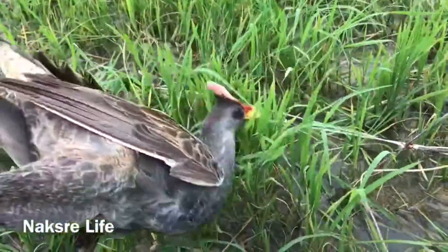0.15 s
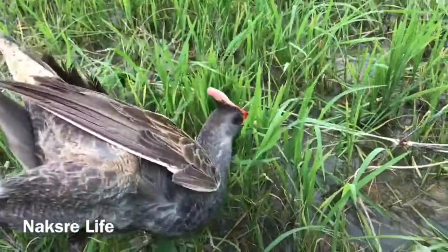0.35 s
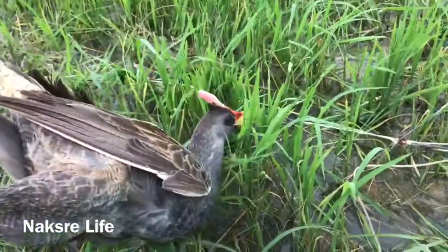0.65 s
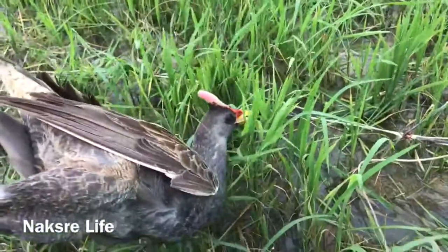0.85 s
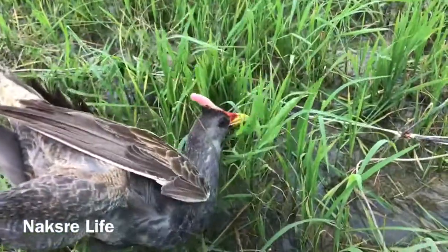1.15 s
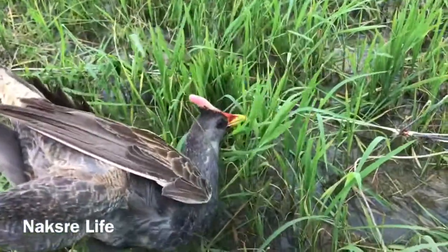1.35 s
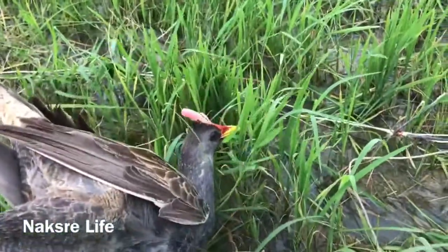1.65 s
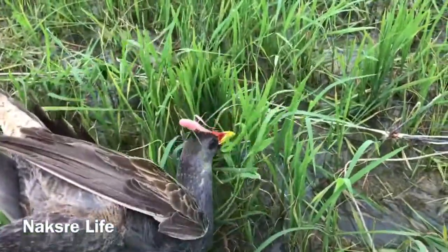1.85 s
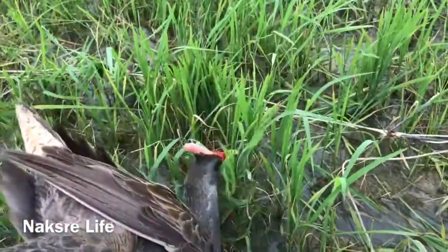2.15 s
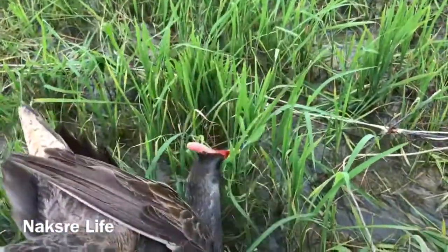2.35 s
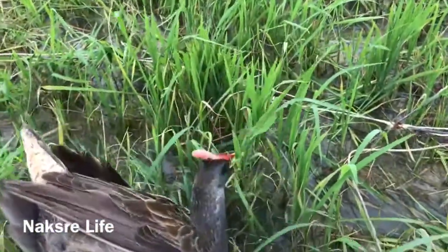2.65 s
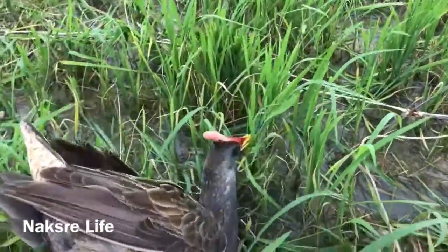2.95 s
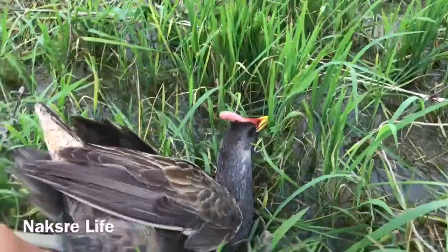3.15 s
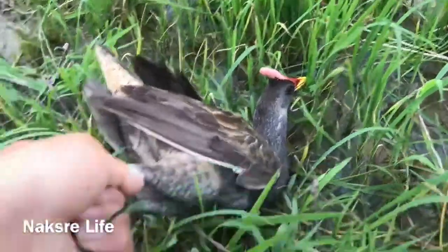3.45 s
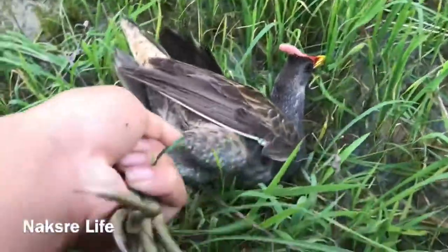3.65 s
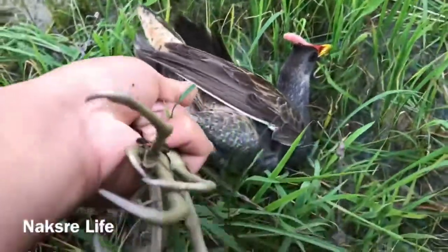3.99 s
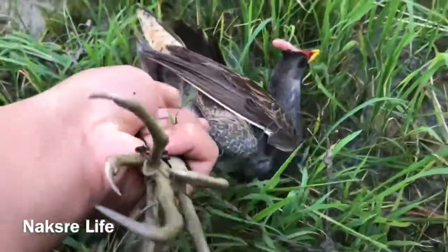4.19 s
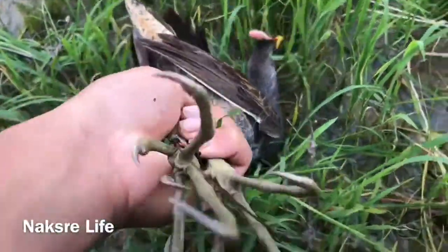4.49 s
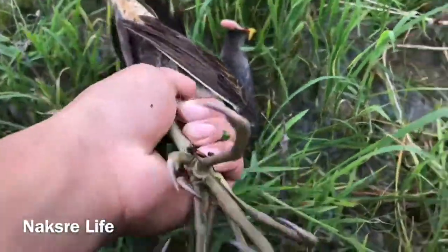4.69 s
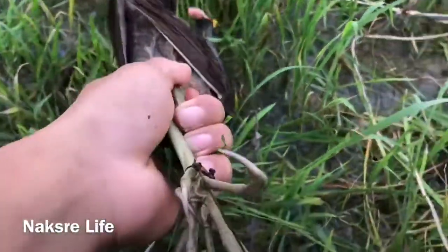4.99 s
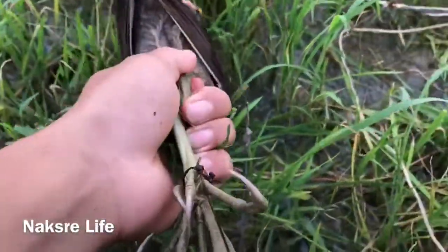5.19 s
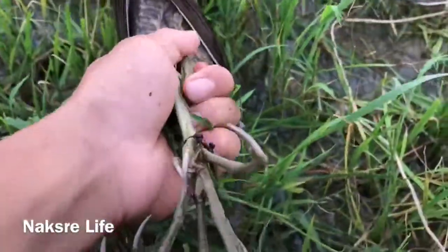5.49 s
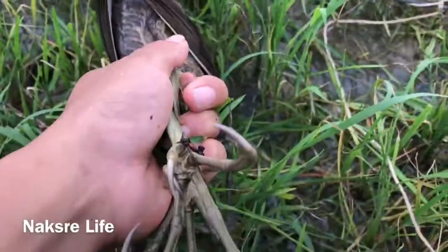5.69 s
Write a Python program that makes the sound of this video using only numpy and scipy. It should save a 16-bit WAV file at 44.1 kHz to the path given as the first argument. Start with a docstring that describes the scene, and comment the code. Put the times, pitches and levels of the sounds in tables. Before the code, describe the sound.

An open wet rice field, dry and without reverberation, heard through a close handheld microphone, equal in both channels. Low breeze rumble and soft dull bumps lie under a faint, wavering chorus of high chirps around 3 kHz. At 0.15 s a dry stalk snaps. From 0.3 to 1.1 s a large bird nearby squawks loudly: a tiny thin whistle, a hoarse start, then a bright nasal tone near 520 Hz sinking abruptly into a brief croak. Between calls come small peeps, distant buzzing rasps around 1.4 s and bumps near 1.7 s. The second squawk, 2.6 to 3.3 s, is a little louder, rough at first, clearing around 2.8 s, then cracking and slowing into a croak. Afterwards it is quiet: weak chirping, a soft distant piping note repeating about every 0.3 s from 3.4 s, sparse tiny ticks, leaf brushes around 4.5 and 5.3 s, and faint rasps near 5.2 and 5.4 s.

```python
"""A light breeze rumbles on the microphone under a far chirping chorus and dry taps of rice stalks.
Then a watercock gives two squawks: each opens with a thin whistle, turns hoarse, clears to a nasal tone
and ends in a slowing croak. The whistle is a few sine partials; the squawk is a pulse train and hiss
ringing throat resonances. Field animals are sine peeps, pulsed rasps and piping; leaves, stalks and
breeze are shaped noise, and soft bumps are low sine bursts."""
import sys
import numpy as np
from scipy import signal
from scipy.fft import rfft, irfft, next_fast_len
from scipy.io import wavfile
from scipy.ndimage import uniform_filter1d, map_coordinates

SR = 44100
rng = np.random.default_rng(int(sys.argv[2]) if len(sys.argv) > 2 else 0)


def unload_wav(signal):
    """Save mono or channel-first audio to the path in sys.argv[1] as 16-bit WAV at rate SR, clipped to [-1, 1]."""
    wavfile.write(
        sys.argv[1],
        SR,
        np.round(np.clip(np.atleast_2d(signal).T, -1, 1) * 32767).astype(np.int16),
    )


N = 257089
TIME = np.arange(N) / SR


def amp(db):
    """Logarithmic level: decibels to linear gain."""
    return 10 ** (np.asarray(db) / 20)


def unit(x):
    """Normalization: scale to an rms of 1."""
    return x / np.sqrt(np.mean(x ** 2) + 1e-20)


def curves(rows):
    """Linear interpolation: one value per sample for each column after the time."""
    s, *columns = np.transpose(rows)
    return [np.interp(TIME, s, column) for column in columns]


def wobble(rate):
    """Band-limited random modulation: a smooth curve through `rate` random knots a second."""
    knots = rng.standard_normal(int(N * rate / SR) + 4)
    return map_coordinates(knots, [TIME * rate])


def gate(start, end, fade):
    """Rectangular envelope: 1 between two times, with linear ramps."""
    return np.clip(np.minimum(TIME - start, end - TIME) / fade + .5, 0, 1)


def bell(centre, half_length):
    """Gaussian envelope: a smooth rise and fall around one moment."""
    return np.exp(-((TIME - centre) / half_length) ** 2)


def filtered(x, response):
    """Linear filtering: multiply the spectrum by a response of frequency."""
    size = next_fast_len(N + 8192)
    return irfft(rfft(x, size) * response(np.fft.rfftfreq(size, 1 / SR)), size)[:N]


def noise(spectrum):
    """Coloured noise: white noise shaped by rows of f/Hz, relative level/dB, then set to rms 1."""
    f, db = np.transpose(spectrum)

    def colour(hz):
        return amp(np.interp(np.log(hz + 1), np.log(f), db, left=-120, right=-120))

    return unit(filtered(rng.standard_normal(N), colour))


def pulses(times, sizes):
    """Band-limited impulses: windowed sincs centred between samples."""
    at = times[:, None] * SR
    index = np.floor(at).astype(int) + np.arange(-7, 9)
    shape = np.sinc(index - at) * np.cos(np.pi * (index - at) / 16) ** 2
    return np.bincount(np.clip(index, 0, N - 1).ravel(), (sizes[:, None] * shape).ravel(), N)


def resonate(x, modes, size=4096):
    """Minimum-phase resonance: causal ringing with steep skirts, from rows of f/Hz, width/Hz, level/dB."""
    hz = np.fft.rfftfreq(size, 1 / SR)
    gain = sum(amp(db) / (1 + ((hz - centre) / width) ** 2) ** 2 for centre, width, db in modes)
    # folding the cepstrum onto positive times makes the response causal
    cepstrum = irfft(np.log(gain + 1e-6))
    cepstrum[1:size // 2] *= 2
    cepstrum[size // 2 + 1:] = 0
    return signal.fftconvolve(x, irfft(np.exp(rfft(cepstrum))))[:N]


def steady(x):
    """Envelope normalization: even out the loudness over a few pulses."""
    power = uniform_filter1d(uniform_filter1d(x ** 2, size=500), size=300)
    return x / np.sqrt(np.abs(power) + 1e-6 * np.mean(x ** 2))


# syrinx pulse rate of each squawk [t/s, f/Hz]
PITCH_1 = [(0.32, 655.8), (0.36, 621), (0.41, 600.5), (0.5, 549.7), (0.55, 527.6), (0.6, 540), (0.675, 516),
           (0.7, 528.4), (0.745, 518.4), (0.8, 525.3), (0.94, 514.4), (1.056, 518), (1.1, 185.5)]
PITCH_2 = [(2.61, 589), (2.67, 542), (2.72, 554.8), (2.77, 551.4), (2.81, 518), (2.86, 497.4),
           (2.915, 537.4), (2.935, 528.5), (2.965, 494), (3.135, 496.8), (3.18, 476.6), (3.24, 370.6),
           (3.265, 198)]
# loudness and beak colour [t/s, low register level/dB, middle re low/dB, high re low/dB]
EFFORT_1 = [(0.325, -49.5, 18, 10), (0.331, -35.5, 3.5, -1), (0.402, -33.5, 8, 2.5), (0.48, -34.5, 8, 3),
            (0.938, -34, 3.5, -2.5), (1.065, -35.5, 2.5, -6), (1.078, -37, 11, 5),
            (1.098, -36.5, -1.5, -12)]
EFFORT_2 = [(2.612, -49, 16, 11), (2.622, -32.5, -6.5, -5.5), (2.668, -31.5, -7.5, -4.5),
            (3.118, -29, -7, -4.5), (3.166, -30.5, -12.5, -9), (3.234, -28.5, -3.5, -0.5),
            (3.265, -31, -14, -11.5)]
# throat and beak resonances [f/Hz, width/Hz, level/dB]
THROAT_1 = [(514, 210, -5.5), (997, 150, -9), (1320, 43, -8), (1540, 310, -15.5), (1770, 250, 1.5),
            (2176, 210, 3), (2680, 235, -1.5), (3670, 290, -3), (4070, 210, -14), (4660, 300, -9.5),
            (5300, 99, -25.5), (5720, 340, -15), (7200, 1020, -27.5), (9400, 1060, -28),
            (12500, 8200, -47.5)]
THROAT_2 = [(540, 303, -5.5), (986, 213, -3), (1533, 170, -13), (1988, 74, -9.5), (2570, 530, -15),
            (3446, 290, 0), (4007, 71, -1.5), (4490, 500, -6.5), (6300, 1000, -28), (9300, 1170, -31.5),
            (14300, 3000, -56.5)]
# resonances of the tightened throat in the closing croak [f/Hz, width/Hz, level/dB]
CROAK_1 = [(507, 370, -5), (1034.5, 254, -4), (1884, 460, 1), (2230, 660, 1), (3834, 410, -8.5),
           (4630, 460, -18), (5820, 500, -26), (8700, 1700, -29)]
CROAK_2 = [(404, 370, -2), (860, 190, 5.5), (1102, 184, 11.5), (2010, 270, -11), (3200, 414, -5),
           (3850, 280, 5), (4720, 730, -7.5), (6350, 2100, -25.5), (8500, 2500, -26), (13400, 2200, -42)]
# broad bands filled by the rushing air while the voice is rough [f/Hz, width/Hz, level/dB]
RUSH = [(2970, 480, -3), (4300, 520, -6), (5240, 500, -14.5), (6750, 910, -20), (9210, 720, -20.5),
        (11700, 3700, -38.5)]
AIR, LEAK = 1.2, .13  # hiss per unit of roughness; share of the uneven register that adds hiss
SHIMMER = .36  # spread of pulse size (natural log) per unit of roughness


def squawk(pitch, course, effort, throat, croak, jitter, limp, tremor, echo, echo_time, rush_db):
    """Source-filter principle: syrinx pulses and hiss ring the throat; roughness shakes the pulses.

    jitter and limp are in cycles, echo_time in seconds."""
    hz, rough, uneven = syrinx(pitch, course)
    cycles = np.cumsum(hz * (1 + tremor * wobble(90) * (0.2 + rough))) / SR
    count = np.arange(1, int(cycles[-1]))
    times = np.interp(count, cycles, TIME)

    def at_pulse(curve):
        return np.interp(times, TIME, curve)

    # the membranes lurch over a few cycles at a time, and a little from each pulse to the next
    late = at_pulse(rough) * (at_pulse(wobble(260)) + 0.59 * rng.standard_normal(len(count)))
    strong = at_pulse(rough) * (at_pulse(wobble(200)) + .7 * rng.standard_normal(len(count)))
    # every other pulse comes early and weak, which adds lines halfway between the harmonics
    swing = limp * (-1.) ** count * at_pulse(uneven * (1 + .3 * wobble(14)))
    pulse_times = times + (jitter * late + swing) / at_pulse(hz)
    flow = pulses(pulse_times, np.exp(SHIMMER * strong + 2 * swing))

    # air hisses through once in each cycle
    hiss = filtered(rng.standard_normal(N), lambda f: np.hypot(f, 800) / np.hypot(f, 7000))
    hiss = hiss * (1 + np.cos(2 * np.pi * cycles))
    source = unit(windpipe(flow)) + AIR * (rough + LEAK * uneven) * hiss

    # the throat tightens as the pitch sinks into the croak
    tight = np.clip((470 - hz) / 80, 0, 1)
    voice = resonate(source * (1 - tight), throat) + resonate(source * tight, croak)
    voice = voice + amp(rush_db) * resonate(hiss * rough * (1 - tight), RUSH)

    # the opening of the beak shifts the balance between three registers
    def below(f, edge_hz):
        return 1 / (1 + (f / edge_hz) ** 20)

    low = filtered(voice, lambda f: below(f, 1400))
    middle = filtered(voice, lambda f: below(f, 3000)) - low
    high = voice - low - middle
    # the treble also glances off the wet ground, by a path that shifts as the head moves
    delay = echo_time * (1 + 0.052 * wobble(5.91))
    high = high + echo * map_coordinates(high, [(TIME - delay) * SR])
    db, middle_db, high_db = curves(effort)
    call = amp(db) * (steady(low) + amp(middle_db) * steady(middle) + amp(high_db) * steady(high))
    return call * gate(pitch[0][0], pitch[-1][0] + .002, fade=0.013)


# instants when the voice cracks [t/s, half length/s, pitch jump/Hz, roughness]
CRACKS = [(.402, .005, 0, 1.1), (.903, .009, -13, .15), (.978, .008, -28, .35), (2.833, .007, 38, 1),
          (3.077, .011, -70, .9), (3.16, .007, -25, .5)]
# course of each squawk [hoarse roughness, clears at t/s, roughness once clear,
# alternate pulses start to limp at t/s, limp rise time/s]
COURSE_1 = (.46, .476, .14, .3, .6)
COURSE_2 = (.62, 2.802, .1, 2.952, .02)
ONSET_ROUGH, CROAK_ROUGH = .9, .65  # roughness of the first instant and of the full croak
ONSET_S, CLEARING_S = 0.04, 0.018  # decay of the onset roughness; time for the hoarseness to clear
BREAK_HZ, BREAK_RANGE_HZ = 490, 64.4  # below this pitch, over this range, regularity is lost


def syrinx(pitch, course):
    """Irregular oscillation: pitch, roughness and limp, rough at onset, cracks and pitch collapse."""
    hoarse, clears_at, clear, limps_at, limp_rise = course
    hz = curves(pitch)[0] + sum(jump * bell(s, length) for s, length, jump, _ in CRACKS)
    onset = ONSET_ROUGH * np.exp(-np.maximum(TIME - pitch[0][0], 0) / ONSET_S)
    body = clear + (hoarse - clear) * np.clip((clears_at - TIME) / CLEARING_S + .5, 0, 1)
    cracks = sum(rough * bell(s, length) for s, length, _, rough in CRACKS)
    collapse = np.clip((BREAK_HZ - hz) / BREAK_RANGE_HZ, 0, 1)
    rough = np.max([onset, body, cracks, CROAK_ROUGH * np.sqrt(collapse)], axis=0)
    uneven = np.clip((TIME - limps_at) / limp_rise, 0, 1) * (1 - collapse)
    return hz, rough, uneven


def windpipe(x):
    """Dispersion: the long windpipe lets the treble out first, smearing each pulse by up to 3 ms."""
    return filtered(x, lambda hz: np.exp(-2j * np.pi * .003 * 3000 * np.log1p(hz / 3000)))


def hollow(x, notch_hz, notch_width):
    """Notch filtering: one narrow band of the voice nearly vanishes, which sounds hollow."""
    return filtered(x, lambda hz: 1 - .95 * np.exp(-((hz - notch_hz) / notch_width) ** 2))


# opening whistle of each squawk [t/s, f/Hz, level/dB]
WHISTLE_1 = [(.281, 2010, -54), (.287, 2316, -37), (.3, 2347, -30), (.312, 2346, -37), (.319, 2296, -23.5),
             (.325, 2310, -25.5), (.332, 2280, -45)]
WHISTLE_2 = [(2.574, 2156, -53), (2.582, 2273, -31.5), (2.598, 2250, -30.5), (2.612, 2164, -32.5),
             (2.624, 2190, -56)]


def whistle(rows, throat, second_db, third_db, rasp_db):
    """Harmonic synthesis: before it breaks into pulses the syrinx sings one high note, with growing rasp."""
    hz, db = curves(rows)
    start, end = rows[0][0], rows[-1][0]
    phase = 2 * np.pi * np.cumsum(hz * (1 + 0.0021 * wobble(200))) / SR
    upper = np.sin(3 * phase) + .4 * np.sin(4 * phase)
    tone = np.sin(phase) + amp(second_db) * np.sin(2 * phase) + amp(third_db) * upper
    growth = np.clip((TIME - start) / (end - start), 0, 1) ** 2
    rasp = unit(resonate(rng.standard_normal(N), throat)) * growth
    return (np.sqrt(2) * tone + amp(rasp_db) * rasp) * amp(db) * gate(start, end, fade=0.004)


# soft low bumps close to the microphone [t/s, f/Hz, peak level/dB]
BUMPS = [(.07, 86, -29.5), (0.263, 68, -28.5), (0.48, 146, -31.5), (0.513, 145, -35.5), (0.567, 100, -30.5),
         (0.799, 70, -33.5), (0.886, 98, -33.5), (1.01, 70, -38), (1.641, 60.4, -35.5), (1.705, 99, -35.5),
         (1.857, 70, -40), (2.42, 74.6, -44), (4.781, 61, -40.5)]


def bumps(length):
    """Gaussian tone burst: each bump is a dull thud, a low sine under a brief bell."""
    out = np.zeros(N)
    for s, hz, db in BUMPS:
        tone = np.sin(2 * np.pi * hz * (TIME - s) + rng.uniform(0, 2 * np.pi))
        out += amp(db) * tone * bell(s, length)
    return out


# stalks snapping and tapping [t/s, peak level/dB, f/Hz of the stalk]
TICKS = [(.147, -34, 1800), (.151, -29, 1600), (2.255, -48, 800), (3.655, -54, 7000), (4.222, -53, 7500),
         (4.468, -53, 9000), (4.665, -50, 1100), (4.693, -55, 700), (4.93, -53, 450), (5.565, -52, 8000)]


def ticks(t60, breadth):
    """Damped resonance: each stalk gives a short dry noise burst around its own pitch."""
    out, t = np.zeros(N + SR), np.arange(2048) / SR
    for s, db, hz in TICKS:
        b, a = signal.iirpeak(hz, 1 / breadth, fs=SR)
        strike = rng.standard_normal(len(t)) * amp(-60 * t / t60)
        burst = signal.lfilter(b, a, signal.lfilter(b, a, strike))
        out[round(s * SR):][:len(t)] += amp(db) * burst / np.abs(burst).max()
    return out[:N]


# steady stir of the rice leaves [t/s, level/dB]
LEAVES = [(0, -74.5), (1.8, -74), (2.15, -70), (2.55, -69), (3.3, -76), (4.7, -71.5), (5.83, -73.5)]
# single leaves brushing past [t/s, level/dB]
SWISHES = [(.13, -68), (1.435, -69.5), (1.6, -79), (4.3, -76.5), (4.48, -69), (5.299, -65.5), (5.58, -73)]
# colour of the rustle [f/Hz, relative level/dB]
SWISH = [(2500, 4), (4000, -2.5), (5000, -0.5), (6600, 6), (7600, 2), (8600, 5), (9800, 1.5), (10600, -6.5),
         (15500, -5)]
SWISH_S = 0.019  # half length of a brush


def leaves(grain_db):
    """Friction noise: rice leaves slide over one another and over feathers, with a fine crackle."""
    brushes = sum(amp(db) * bell(s, SWISH_S) for s, db in SWISHES)
    level = np.hypot(amp(curves(LEAVES)[0]), brushes)
    crackle = amp(grain_db * wobble(400) + 1.8 * wobble(25))
    return level * unit(noise(SWISH) * crackle)


# the nearest peeps of the chorus [t/s, f/Hz, peak level/dB]
PEEPS = [(1.2, 3410, -50), (1.351, 5360, -70), (1.869, 3300, -50.5), (2.19, 3640, -52), (2.31, 3520, -53),
         (2.42, 3460, -58), (3.509, 3100, -60), (5.09, 3150, -60)]
PEEP_S, PEEP_FALL = .024, .4  # half length; half the fall in pitch (share per second)


def near_peeps(length, fall):
    """Frequency glide: a few peeps stand out of the chorus, each a short falling note."""
    flutter = np.cumsum(0.01425 * wobble(270)) / SR
    out = np.zeros(N)
    for s, hz, db in PEEPS:
        t = TIME - s
        out += amp(db) * np.sin(2 * np.pi * hz * (t - fall * t ** 2 + flutter)) * bell(s, length)
    return out


# far rasping calls [t/s, length/s, level/dB]
RASPS = [(1.36, 0.03, -57.5), (1.404, 0.052, -54), (5.184, 0.055, -57), (5.393, 0.027, -64),
         (5.423, 0.06, -57.5)]
# a distant soft piping note, repeated at one level [t/s]
PIPING = [3.42, 3.69, 4.01, 4.33, 4.64, 4.92, 5.16, 5.42, 5.69]
PIPING_DB = -71.5  # peak level


def far_calls(rasp_rate_hz, pipe_hz, pipe_length):
    """Pulse excitation and pure tone: a few buzzing rasps and a repeated piping note across the field."""
    cycles = np.cumsum(rasp_rate_hz * (1 + 0.043 * wobble(72))) / SR
    times = np.interp(np.arange(1, int(cycles[-1])), cycles, TIME)
    train = pulses(times, rng.lognormal(0, 0.14, len(times)))
    buzz = unit(resonate(train, [(3230, 490, 9), (4040, 1100, -1), (6800, 1200, -31)]))
    rasps = buzz * sum(amp(db) * gate(s, s + length, fade=0.0055) for s, length, db in RASPS)
    note = np.sin(2 * np.pi * np.cumsum(pipe_hz * (1 + 0.0187 * wobble(60))) / SR)
    return rasps + amp(PIPING_DB) * note * sum(bell(s, pipe_length) for s in PIPING)


# colour of the blurred chorus [f/Hz, relative level/dB]
FAR = [(1800, -36), (2400, -16.5), (2850, -5.5), (3250, 0), (3600, -1.5), (4100, -10.5), (5000, -22),
       (7000, -25)]


def chorus(peep_hz, spread, fall, length, overtone_db, peep_db, count=260):
    """Superposition: many far falling peeps, mostly blurred into a band of noise by the distance."""
    t = np.arange(int(length * SR)) / SR
    peeps = np.zeros(N + len(t))
    for k, (when, tune, size) in enumerate(rng.standard_normal((count, 3))):
        hz = peep_hz * np.exp(spread * tune - fall * (t / length - .5))
        phase = 2 * np.pi * np.cumsum(hz) / SR
        tone = np.sin(phase) + amp(overtone_db) * np.sin(2 * phase)
        start = int((k + when / 2) % count / count * N)
        peeps[start:start + len(t)] += amp(2 * size) * np.hanning(len(t)) * tone
    scattered = unit(peeps[:N] * (1 + 0.45 * wobble(300)))
    return chorus_level(waver_db=3.0, waver_rate=16) * (amp(peep_db) * scattered + noise(FAR))


# underlying level of the far chorus [t/s, level/dB]
CHORUS = [(0, -61.5), (1.8, -58), (2.5, -59.5), (3.3, -67), (3.6, -64.5), (5.83, -63)]
# one group of callers swells above the rest [centre t/s, length/s, level/dB]
SWELLS = [(0.198, 0.075, -57.5), (1.203, .1, -58), (1.65, 0.069, -54), (1.894, 0.049, -53.5),
          (3.796, 0.066, -60), (3.995, 0.048, -58.5), (4.78, 0.063, -62)]
# moments when the chorus falls quiet [t/s]
LULLS = [.11, 1.335, 2.145, 2.445, 3.675, 4.395, 4.64, 5.16, 5.625]
SWELL_EDGE_S, LULL_DB, LULL_S = .02, -8, 0.017  # swell ramp; lull depth and half length


def chorus_level(waver_db, waver_rate):
    """Amplitude modulation: the chorus wavers, dips in lulls, and now and then a group swells."""
    lulls = LULL_DB * sum(bell(s, LULL_S) for s in LULLS)
    bed = amp(curves(CHORUS)[0] + lulls + waver_db * wobble(waver_rate))
    swells = sum(amp(db) * gate(s - length / 2, s + length / 2, SWELL_EDGE_S) for s, length, db in SWELLS)
    return np.hypot(bed, swells)


# level of the wind rumble before gusts and low cut [t/s, level/dB]
BREEZE = [(0, -49), (.27, -46.5), (.42, -47.5), (.6, -47.5), (.95, -53.5), (1.35, -51), (1.7, -52),
          (2.1, -53.5), (2.45, -52), (2.6, -60), (3.05, -61), (3.8, -56), (4.22, -52.5), (4.6, -55),
          (5.83, -57)]
# colour of the rumble before the low cut [f/Hz, relative level/dB]
RUMBLE = [(13, -57), (22, -17.5), (48, 5), (81, 0.5), (134, -6), (257, -16.5), (342, -24), (370, -28.5),
          (500, -52), (650, -64), (1100, -120)]
# level of the open field's hush [t/s, level/dB]
HUSH = [(0, -66.5), (3.3, -69), (5.83, -72.5)]
# colour of the hush [f/Hz, relative level/dB]
FIELD = [(160, -15), (280, -2.5), (367, -10.5), (601, -9), (745, -15), (1420, -13.5), (2060, -16),
         (2600, -13.5), (3380, -47), (5720, -120)]
GUST_DB, GUSTS_PER_S = 2.5, 20  # the breeze flutters about its level


def breeze():
    """Turbulent pressure noise: soft buffeting at the microphone over the hush of the open field."""
    db, = curves(BREEZE)
    air = noise(RUMBLE)
    even_air = air / np.sqrt(np.abs(uniform_filter1d(air ** 2, size=4000)) + 0.01)
    buffet = amp(db + GUST_DB * wobble(GUSTS_PER_S)) * even_air
    rumble = filtered(buffet, lambda hz: hz ** 4 / (hz ** 4 + 33 ** 4))
    return rumble + amp(curves(HUSH)[0]) * noise(FIELD)


def scene():
    """Linear mixing: the bird close by in the open, the field behind it; both channels alike."""
    first = squawk(PITCH_1, COURSE_1, EFFORT_1, THROAT_1, CROAK_1, jitter=0.065, limp=.011,
                   tremor=0.0124, echo=0.5, echo_time=.0017, rush_db=2.0)
    second = squawk(PITCH_2, COURSE_2, EFFORT_2, THROAT_2, CROAK_2, jitter=0.067, limp=0.008,
                    tremor=.012, echo=0.62, echo_time=0.001345, rush_db=1.0)
    first = hollow(first, notch_hz=2974, notch_width=144)
    second = hollow(second, notch_hz=7400, notch_width=200)
    first = first + whistle(WHISTLE_1, THROAT_1, second_db=-16.0, third_db=-23.5, rasp_db=-20)
    second = second + whistle(WHISTLE_2, THROAT_2, second_db=-11.5, third_db=-33, rasp_db=-3.5)
    near = bumps(length=0.0082) + ticks(t60=0.01, breadth=0.81) + leaves(grain_db=2.0)
    field = near_peeps(PEEP_S, PEEP_FALL) + far_calls(rasp_rate_hz=330, pipe_hz=1500, pipe_length=0.024)
    field = field + chorus(peep_hz=3263, spread=.045, fall=0.1176, length=0.06,
                           overtone_db=-20.0, peep_db=-4.0)
    mono = first + second + near + field + breeze()
    return np.array([mono, mono])


def record(dry):
    """Band limitation: the recorder keeps nothing from 15720 Hz up."""
    return np.array([filtered(channel, lambda hz: hz < 15720) for channel in dry])


dry = scene()
out = record(dry)
unload_wav(out)
```